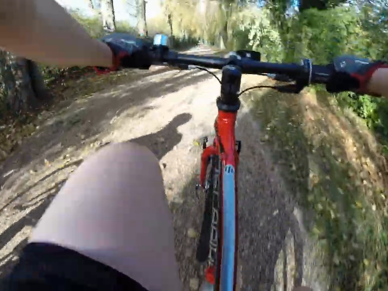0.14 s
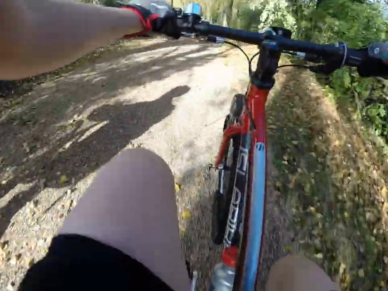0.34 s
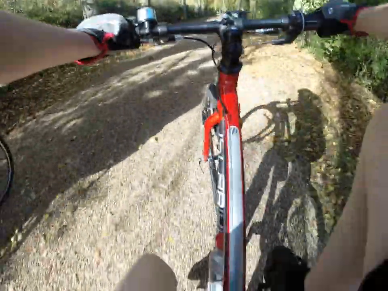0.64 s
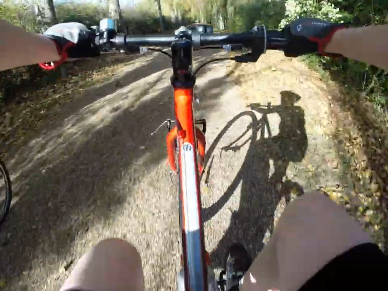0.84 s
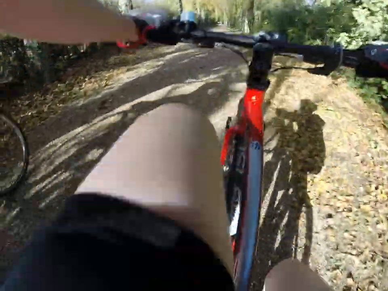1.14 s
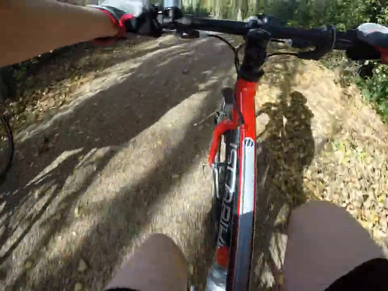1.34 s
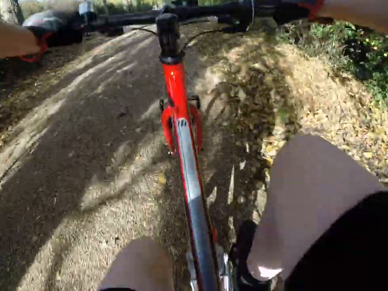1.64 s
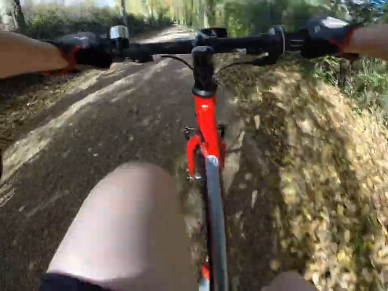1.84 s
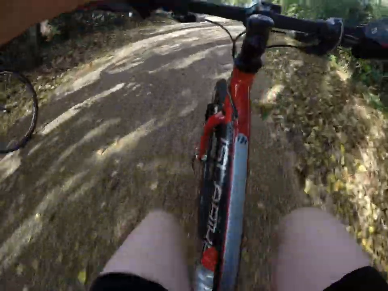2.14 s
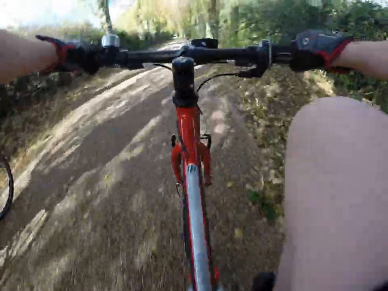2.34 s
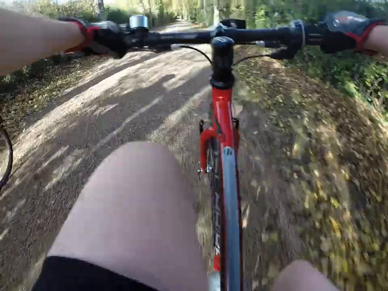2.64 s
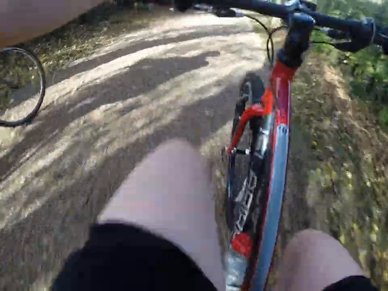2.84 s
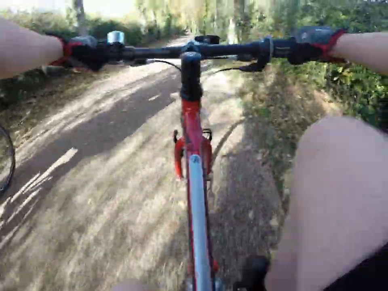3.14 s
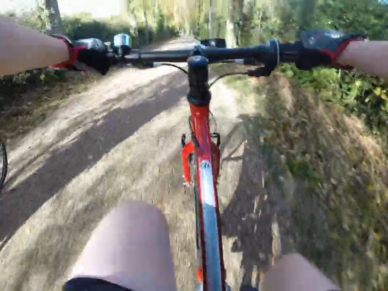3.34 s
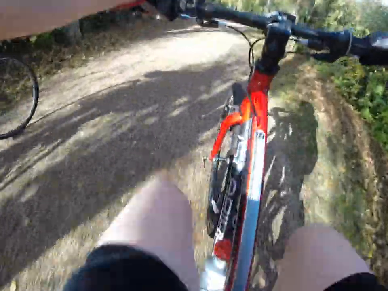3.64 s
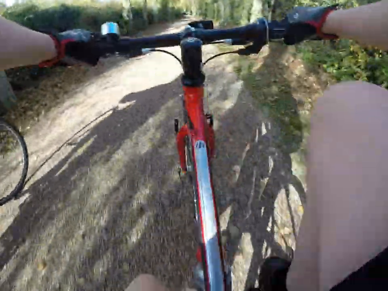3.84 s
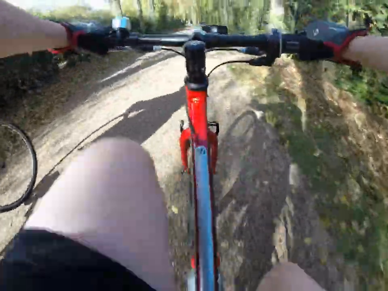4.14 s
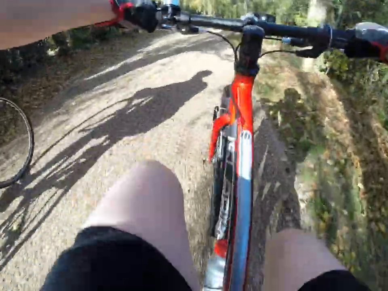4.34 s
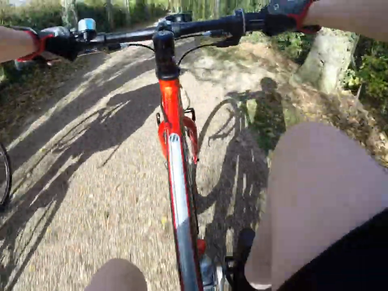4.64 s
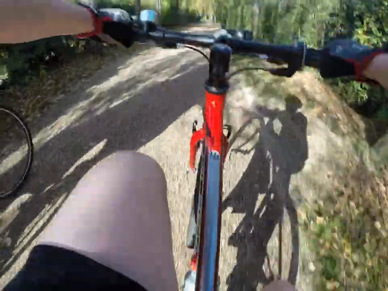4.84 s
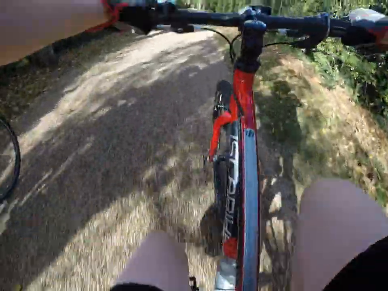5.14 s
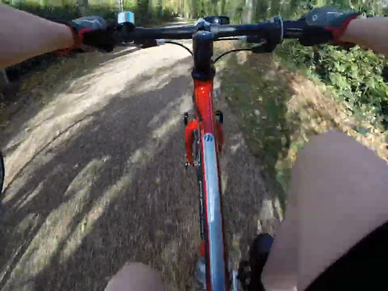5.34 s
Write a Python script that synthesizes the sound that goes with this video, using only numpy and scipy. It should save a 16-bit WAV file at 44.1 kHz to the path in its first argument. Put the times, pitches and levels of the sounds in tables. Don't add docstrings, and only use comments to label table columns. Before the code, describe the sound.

From 0 s, bicycle tyres grind steadily over gravel: a dense, grainy crunch strongest in the mid and upper-mid range, coloured boxy by a closed camera housing on the rider's chest. A thin dry-leaf hiss lies above it. Irregular stone pops, several each second, crack and ring briefly around 2.5 to 4.7 kHz, amid smaller pebble clicks, short scraping skids and leaf snaps. A plastic buckle ticks lightly near 2 kHz. Below, slow chest heaves make a very low, wavering rumble. Bumps shove the housing at about 1.2 s and 2.0 s with soft thumps and strap rub; another comes at 2.5 s with a cluster of leaf snaps. At 3.65 s the hardest bump thuds, scuffs the straps, knocks the mount and rattles the buckle. Crunch, pops and ticks continue, with further jolts near 4.8, 5.0 and 5.35 s, while the low heaves strengthen until 5.5 s. Mono, close, without echo.

```python
import sys
import numpy as np
from scipy import signal
from scipy.fft import rfft, irfft, next_fast_len
from scipy.io import wavfile
from scipy.ndimage import uniform_filter1d, map_coordinates

SR = 44100
rng = np.random.default_rng(int(sys.argv[2]) if len(sys.argv) > 2 else 0)


def to_wav(sig):
    pcm = np.clip(np.atleast_2d(sig), -1, 1) * 32767
    pcm = np.round(pcm).astype(np.int16)
    wavfile.write(sys.argv[1], SR, pcm.T)


def volts_from_decibels(level):
    exponent = np.asarray(level, float) / 20
    return 10 ** exponent


N = 242550

# (time [s], gravel level [dB], leaf litter level [dB])
GROUND = [(0.0, -43.5, -57), (0.52, -42, -56), (0.75, -42, -55), (0.98, -41.5, -58.5), (2.02, -43.5, -58),
          (2.14, -43.5, -58), (2.36, -41.5, -55.5), (2.56, -43.5, -57), (2.77, -43, -57.5),
          (2.99, -43, -58.5), (3.17, -44.5, -54.5), (3.49, -43, -59.5), (3.89, -44, -57.5),
          (4.35, -43.5, -58.5), (4.69, -41, -56.5), (5.08, -44.5, -62), (5.16, -42.5, -58),
          (5.5, -42, -60.5)]
# (time [s], coarse grit gain [dB], fine grit gain [dB])
WHEEL_LOADS = [(.64, 2.5, 1), (.89, 0.5, 1.5), (1.11, -3, -1.5), (1.42, 1, 4.5), (1.55, 0, 0),
               (1.61, -1, 2), (1.8, 0, 1.5), (1.91, 0, 1), (2.21, 2.5, 3.5), (2.37, 0, 0.5), (3.13, 2, -4),
               (3.25, 2, -2), (3.41, 1, 0), (3.68, 1.5, -0.5), (3.81, 1.5, -1), (4.07, 3.5, 2.5),
               (4.125, -1.5, -0.5), (4.21, -1, -1), (4.985, -0.5, 5), (5.015, -0.5, -5.5), (5.07, 5, 6.5),
               (5.45, -3.5, 2.5), (5.5, 3.5, 1)]
# (time [s], share [0-1])
CRISP_SHARE = [(0.0, .95), (0.15, 0.7), (0.5, 0.4), (0.9, 0.5), (1.2, 0.5), (1.4, 0.54), (2.05, 0.56),
               (2.3, 0.6), (2.6, 0.8), (2.85, 0.54), (3.4, .8), (3.55, 0.4), (3.7, 0.75), (4.3, 0.6),
               (4.6, 0.74), (5.0, .4), (5.2, .7), (5.5, 0.5)]
# (time [s], peak level [dB])
LEAF_SNAPS = [(0.0947, -59), (0.2468, -55), (0.5262, -44.5), (0.5901, -55), (2.3017, -43), (2.366, -43),
              (2.5331, -45), (4.0128, -48), (4.7361, -46), (2.4329, -45), (2.5002, -40), (3.571, -44),
              (3.6686, -46), (4.4463, -51), (4.8489, -44), (4.89, -43), (5.4595, -49), (1.39, -44.5),
              (2.21, -45), (3.81, -44), (4.62, -50)]
# (frequency [Hz], level [dB per Hz])
LEAF_SPECTRUM = [(5000, -36), (7000, -0.5), (8100, -7), (9040, -8.5), (9600, -6), (10150, -7.5),
                 (10600, -0.5), (11000, -6.5), (11600, -7.5), (12300, -4.5), (13200, -3.5), (14300, -10),
                 (15200, -10)]
# (frequency [Hz], gain [dB])
WALL = [(300, -17.5), (600, -11), (870, -14), (1250, -9), (2000, -5.5), (2900, -3.5), (4200, -10.5),
        (5200, -18.5), (6300, -15), (8200, -35.5), (15000, -43)]
# (frequency [Hz], width [Hz], gain [dB])
HOUSING_MODES = [(1499, 93, 7.5), (1673, 28, -7), (2080, 50, -6), (2850, 170, -0.5), (3145, 45, -8),
                 (3440, 61, 2.5), (3710, 320, -0.5), (4624, 320, 10), (6970, 64, -11), (7040, 150, -20),
                 (7380, 95, 9.5)]
# (time [s], peak level [dB], ring [Hz], broad crack relative to ring [dB])
STONES = [(0.2377, -21, 4550, -41), (0.384, -18, 3360, -8), (0.4596, -15.5, 4570, -17),
          (0.5923, -19, 2680, -12), (0.869, -20, 2660, -6), (0.8885, -21.5, 2380, 1.5),
          (1.132, -26, 2850, 1), (1.4118, -16, 2850, -18), (1.494, -16, 2650, -11), (1.548, -26, 2600, 4),
          (1.6134, -19, 4700, -7), (1.6658, -24, 2580, 1), (1.9086, -15, 2510, -11),
          (1.9792, -25, 4520, -3), (2.1782, -19.5, 2500, -1), (2.284, -24, 2950, 0),
          (2.366, -26.5, 2690, 3.5), (2.593, -14.5, 3530, -4.5), (2.9532, -17, 3520, -9),
          (3.238, -23, 2560, -4), (3.411, -17, 2640, -5), (3.7722, -25.5, 2820, 1), (4.051, -19, 4340, -14),
          (4.1385, -16, 4520, -18), (4.6307, -23, 4700, -1), (4.7625, -15, 2260, -11),
          (5.004, -19, 2770, -11), (5.1265, -17, 2800, -10), (5.331, -20, 2640, -9),
          (5.421, -20, 4700, -10)]
# (time [s], peak level [dB], ring [Hz])
PEBBLES = [(0.877, -28, 2400), (0.882, -23, 2290), (0.9874, -29, 1500), (1.9314, -28, 3450),
           (1.9994, -31, 2860), (2.0762, -28, 2500), (2.1208, -25, 2920), (2.5167, -27.5, 2860),
           (2.5604, -30, 2480), (2.6824, -31, 2300), (2.7421, -37, 3480), (2.7875, -27.5, 2260),
           (3.4056, -23, 2400), (3.7208, -27, 2080), (3.7967, -22.5, 3460), (3.9259, -30, 2570),
           (4.3514, -35, 2960), (4.8003, -26, 2190), (4.9474, -34, 2160)]
# (time [s], level [dB])
GRIT_CRACKS = [(0.3294, -48), (0.6073, -32), (0.8184, -31), (0.9334, -35), (1.433, -39), (1.5043, -35),
               (1.5535, -33.5), (1.8049, -29), (1.8607, -45), (1.9083, -35), (1.9507, -33), (2.24, -28.5),
               (2.3022, -38), (2.405, -35), (2.6826, -42), (2.7435, -41), (2.858, -35), (2.9085, -30.5),
               (3.065, -29.5), (3.245, -34), (3.4943, -33.5), (3.6298, -38), (3.958, -33), (3.997, -35),
               (4.1085, -35), (4.148, -33), (4.323, -34), (4.3616, -38), (4.6463, -30), (4.8606, -35),
               (4.8938, -35), (4.9578, -36), (5.0172, -31), (5.0782, -31), (5.135, -35), (5.3024, -34),
               (5.3712, -32), (5.4617, -29)]
# (time [s], peak level [dB])
PINGS = [(0.2186, -19), (0.485, -41), (0.844, -30), (1.3703, -36), (1.732, -19), (2.789, -26),
         (3.3116, -23), (3.436, -17), (3.7768, -18.5), (3.7976, -21), (3.8797, -30), (4.0972, -18.5),
         (4.176, -18.5), (4.3525, -25), (4.831, -20.5), (5.2395, -20), (5.3462, -15), (5.4496, -20)]
# (time [s], level [dB], pitch [Hz])
SCRAPES = [(.32, -43, 3800), (.352, -45, 3270), (.545, -43, 2580), (.4, -48, 6370), (.522, -39.5, 3770),
           (.56, -51, 6500), (.781, -46, 3940), (.856, -44, 4300), (.893, -52, 1420), (1.43, -42, 2860),
           (1.54, -51, 4970), (2.596, -47, 3280), (2.853, -42, 3600), (3.69, -48, 1230), (4.37, -42, 2820),
           (4.41, -44, 4510), (4.555, -45, 4750), (5.34, -44, 1900)]
# (time [s], peak level [dB], ring [Hz])
BUCKLE_TICKS = [(0.0094, -36.5, 2080), (0.11, -38, 2090), (0.2186, -37, 2190), (0.394, -29, 2080),
                (0.429, -34, 2040), (0.452, -36, 2000), (0.674, -27, 2090), (0.793, -33, 2170),
                (0.9176, -32.5, 2150), (1.187, -33.5, 2100), (1.2605, -37, 2080), (1.2698, -32.5, 2090),
                (1.2815, -35, 2050), (1.2838, -35, 1970), (1.2885, -37, 1980), (1.297, -38, 1950),
                (1.441, -39, 2300), (1.459, -34, 2080), (1.6785, -31.5, 2210), (1.78, -32, 2080),
                (2.225, -36, 2440), (2.8118, -31.5, 2050), (3.252, -30, 2040), (3.455, -34.5, 2100),
                (3.57, -35.5, 2020), (3.644, -24.5, 2080), (3.78, -34.5, 2410), (3.8708, -31.5, 2130),
                (4.025, -33, 2040), (4.21, -33.5, 2130), (4.458, -34, 2180), (4.749, -32, 2180),
                (4.8386, -38, 2220), (4.968, -26.5, 2110), (5.2486, -33.5, 2100), (5.3302, -30.5, 2030),
                (5.366, -36, 2400)]
# (time [s], peak level [dB], ring [Hz], gap [s])
BUCKLE_RATTLES = [
    (3.487, -31.5, 2060, 0.0083),
    (3.667, -33, 2160, 0.0071),
]
# (time [s], peak
# level [dB], quickness [Hz], direction
SHOVES = [(0.388, -32.5, 55, 1), (0.606, -39, 65, 1), (1.205, -36, 110, 1), (1.213, -22.5, 93, 1),
          (1.238, -26.5, 92, -1), (1.5761, -32, 155, -1), (1.726, -29.5, 148, -1), (1.9746, -29.5, 78, -1),
          (1.9886, -25.5, 92, -1), (2, -21, 78, -1), (2.015, -33, 55, 1), (2.055, -31.0, 65, -1),
          (2.4081, -35, 65, -1), (2.5033, -23, 92, 1), (2.522, -29, 65, -1), (2.7277, -31.5, 77, 1),
          (2.833, -25.5, 65, 1), (2.862, -31, 55, -1), (3.271, -36, 65, 1), (3.3161, -30, 55, -1),
          (3.4727, -35, 78.5, 1), (3.6476, -29, 92, 1), (3.6574, -22, 91.5, 1), (3.661, -40, 55, 1),
          (3.6695, -18.5, 90.5, 1), (3.6805, -15.5, 109, -1), (3.699, -31, 55, -1), (3.7616, -30, 78, 1),
          (3.785, -30, 92, 1), (3.896, -32.5, 92, -1), (4.0226, -26, 55, -1), (4.034, -34, 55, 1),
          (4.1154, -30, 64.4, -1), (4.521, -28.5, 55, -1), (4.6414, -35, 55, 1), (4.771, -29.5, 129, 1),
          (4.789, -30, 93, -1), (4.8073, -24, 55, -1), (4.844, -41, 65, -1), (4.887, -35, 65, -1),
          (4.906, -31, 92, 1), (4.933, -27, 65, -1), (5.0079, -24.5, 65, -1), (5.058, -36, 55, -1),
          (5.0703, -25.5, 55, 1), (5.252, -34, 55, 1), (5.329, -32, 78, -1), (5.3765, -29.5, 55, 1),
          (1.2032, -34, 320, 1), (1.2259, -34.2, 170, 1), (1.2349, -35, 170, -1),
              (1.573, -35.4, 400, 1), (1.6975, -37, 170, 1), (1.9876, -33, 170, 1), (2.0116, -37, 170, 1),
              (2.4985, -41, 343, -1), (2.8246, -37, 260, -1), (2.8423, -35.5, 171, -1),
              (3.251, -30.5, 170, -1), (3.2685, -32.5, 170, -1), (3.6495, -32, 170, 1),
              (3.655, -37, 210, 1), (3.6628, -27, 170, 1), (3.669, -26, 209, -1), (3.6778, -29, 210, -1),
              (3.6842, -35, 170, -1), (3.7546, -35.5, 210, -1), (3.8066, -40, 170, 1),
              (4.42, -36.5, 166, 1), (4.7774, -34, 210, 1), (4.786, -33, 209, 1), (4.7946, -32, 170, 1),
              (5.0059, -34, 260, 1), (5.372, -39, 170, -1)]
# (time [s], level [dB])
STRAP_SCUFFS = [(1.2, -37), (1.235, -43), (1.567, -42), (1.717, -42), (1.987, -35), (2.366, -49),
                (2.491, -34), (2.82, -41), (3.254, -44), (3.462, -46), (3.646, -24.5), (3.662, -26.5),
                (3.677, -30), (3.749, -46), (4.272, -48), (4.413, -58), (4.769, -36), (4.895, -42),
                (5.0, -40), (5.054, -37), (5.365, -43)]
# (time [s], peak level [dB], ring [Hz])
MOUNT_KNOCKS = [(0.881, -34, 1420), (2.496, -35, 900), (3.133, -39, 1200), (3.405, -36, 1130),
                (3.487, -36, 1100), (3.678, -22, 1050), (4.688, -35, 1090), (4.849, -28, 1510),
                (5.494, -52, 703)]
# (time [s], level [dB])
HEAVES = [(.04, -35.5), (.29, -37), (.5, -43), (.72, -39), (1.03, -36), (1.22, -26.5), (1.3, -51),
          (1.5, -37.5), (1.62, -38), (1.77, -35.5), (1.89, -41), (2.04, -31), (2.31, -34.5), (2.51, -27.5),
          (2.8, -38), (2.9, -29), (3.11, -41), (3.23, -38), (3.31, -35), (3.45, -38), (3.67, -40),
          (3.82, -40.5), (4.03, -27.5), (4.13, -41), (4.3, -33.5), (4.451, -32), (4.68, -27.5), (4.82, -35),
          (5.069, -24.5), (5.26, -27.5), (5.49, -22.5)]
# (time [s], jolt level [dB], strap rub relative to jolt [dB])
JOLTS = [(0.005, -46, 2), (.27, -52, 3), (.38, -73, -44), (.47, -67, -9), (.6, -57, -27), (.83, -42, -19),
         (.95, -61, -10), (1.04, -38, -13), (1.22, -33, -12), (1.58, -33.5, -5.5), (1.73, -43.5, -2.5),
         (1.998, -29, -15.5), (2.4, -33, -15.5), (2.5, -27.5, -11), (2.73, -43, -9), (2.832, -35.5, -4),
         (3.19, -44, -1), (3.261, -34, -12), (3.46, -32.5, -27), (3.57, -50, -4), (3.673, -29, -10.5),
         (3.76, -42, -7), (3.87, -51, -10), (3.97, -46, 2.5), (4.29, -40.5, -3), (4.78, -39, -5),
         (4.9, -42, -5), (5.01, -32.5, -5.5), (5.37, -31.5, -23), (5.5, -35, -10)]
# (time [s], level [dB])
EFFORT = [(0.0, -50), (1.16, -49), (1.26, -49.5), (2.02, -52.5), (2.45, -52.5), (3.31, -51),
          (3.81, -45.5), (4.26, -52.5), (4.58, -51), (4.92, -47), (5.18, -49), (5.5, -54.5)]
# (frequency [Hz], level [dB per Hz])
SWAY_SPECTRUM = [(4, -15.5), (8, -0.5), (22, 3.5), (31, 2), (41, -9), (55, -24.5), (90, -35), (150, -62)]
# (frequency [Hz], level [dB per Hz])
JOLT_SPECTRUM = [(30, -18.5), (55, -3), (90, 2.5), (115, -3), (135, -4), (180, -8.5), (260, -52),
                 (400, -62.5)]
# (frequency [Hz], level [dB per Hz])
RUB_SPECTRUM = [(120, -25.5), (200, 3.5), (240, 0.5), (290, -3), (470, -4.5), (800, -16.5), (1200, -12),
                (2000, -33)]


def tyres():
    gravel_db, litter_db = curves(GROUND)
    coarse_db = swells([(s, db) for s, db, _ in WHEEL_LOADS], width_s=0.035)
    fine_db = swells([(s, db) for s, _, db in WHEEL_LOADS], width_s=0.035)
    surge_db = wobble(45)

    crackle = grains(low_hz=1900, high_hz=7540, cycles=1.86, spread_db=3.5, clump=0.5, count=14000)
    grind = patchy(depth_db=2) + volts_from_decibels(-5) * crackle
    grind += volts_from_decibels(-2) * grit(per_s=1500, spread_db=3.3, clump=0.7)
    crunch = unit(steady(coloured(grind, housing), span_s=0.42, share=0.38))

    upper = np.clip((np.fft.rfftfreq(N, 1 / SR) - 4900) / 600, 0, 1)
    sand = irfft(rfft(crunch) * upper, N)
    gravel = volts_from_decibels(gravel_db + coarse_db + 0.16) * (crunch - sand)
    sand_db = -54 + 0.38 * (gravel_db - gravel_db.mean()) + (litter_db - litter_db.mean()) + fine_db
    ground = volts_from_decibels(0.55 * surge_db) * (gravel + volts_from_decibels(sand_db) * unit(sand))
    leaf_db = litter_db + 0.71 * fine_db + 1.0 + 0.89 * surge_db + 0.22 * wobble(21.3)
    return ground + volts_from_decibels(leaf_db) * leaf_hiss() + leaf_snaps()


def leaf_hiss():
    rustle = patchy(depth_db=2.0, size=6) + volts_from_decibels(-7) * grit(per_s=1200, spread_db=4.5, clump=0.61)
    crisp = unit(steady(shaped(rustle, LEAF_SPECTRUM), span_s=0.51, share=0.7))
    dull = shaped(crisp, [(11000, 2.5), (15000, -10)])
    share = np.clip(curves(CRISP_SHARE)[0] + 0.058 * wobble(12), 0, 1)
    return share * crisp + (1 - share) * dull


def leaf_snaps():
    snaps, t = np.zeros(N), np.arange(300) / SR
    for s, db in LEAF_SNAPS:
        add(snaps, s, volts_from_decibels(db + 6.5) * rng.standard_normal(len(t)) * volts_from_decibels(-60 * t / 0.012))
    return shaped(snaps, LEAF_SPECTRUM)


def stones():
    events = STONES + [(s, db + 3.5, hz, -2.5) for s, db, hz in PEBBLES]
    events = events + [(s, db + 3.5, 2620, 3) for s, db in GRIT_CRACKS]
    events = events + [(s, db, 4520, -12) for s, db in PINGS]
    rings, cracks, t = np.zeros(N), np.zeros(N), np.arange(500) / SR
    crumble = volts_from_decibels(-60 * t / 0.011) * (1 - np.exp(-t / 0.0006))
    first_break = 7.5 * (np.arange(len(t)) == 30)
    for s, db, hz, crack_db in events:
        add(rings, s - 0.0004, volts_from_decibels(db - 14) * ring(hz, rise_s=0.0004, t60=0.018, length_s=0.03))
        burst = unit((rng.standard_normal(len(t)) + first_break) * crumble)
        add(cracks, s - 0.0003, volts_from_decibels(db + crack_db + 4.5) * burst)
    tilt = [(800, -26), (1500, -15), (2400, -11), (3600, -6), (4600, -9.5), (6000, -11)]
    return rings + coloured(cracks, lambda hz: housing(hz) + along(tilt, hz))


def scrapes():
    out, t = np.zeros(N), np.arange(-2000, 2000) / SR
    half_s, fall_per_s = 0.013, 2.2
    noises = rng.standard_normal((len(SCRAPES), 2, len(t)))
    for (s, db, hz), noise in zip(SCRAPES, noises):
        a, b = uniform_filter1d(uniform_filter1d(noise, size=28), size=16)
        phase = 2 * np.pi * hz * t * (1 - fall_per_s * t / 2)
        band = unit(a * np.sin(phase) + b * np.cos(phase))
        add(out, s + t[0], volts_from_decibels(db) * np.exp(-0.5 * (t / half_s) ** 2) * band)
    return out


def buckle():
    out, t = np.zeros(N), np.arange(600) / SR
    bounces = [(s + k * gap_s, db - k * 4.5, hz) for s, db, hz, gap_s in BUCKLE_RATTLES for k in range(4)]
    after = t - 0.0022
    for s, db, hz in BUCKLE_TICKS + bounces:
        width_s = 0.00103 * np.exp(0.07 * rng.standard_normal())
        beat_hz = 200 + 250 * rng.random()
        burst = np.exp(-0.5 * (after / width_s) ** 2)
        tail = 0.25 * (after > 0) * volts_from_decibels(-60 * after / 0.03) * np.cos(2 * np.pi * beat_hz * after)
        add(out, s - 0.0011, volts_from_decibels(db + 2.2) * (burst + tail) * np.sin(2 * np.pi * hz * t))
    return out


def shoves():
    out, t = np.zeros(N), np.arange(SR // 10) / SR
    for s, db, hz, direction in SHOVES:
        u = (np.pi * hz * (t - 0.05)) ** 2
        add(out, s - 0.05, np.sign(direction) * volts_from_decibels(db) * (1 - 2 * u) * np.exp(-u))
    return out


def strap_scuffs():
    out, t = np.zeros(N), np.arange(SR // 10) / SR
    decay = volts_from_decibels(-60 * t / 0.058) * (1 - np.exp(-t / 0.0057))
    for s, db in STRAP_SCUFFS:
        add(out, s, volts_from_decibels(db + 14.0) * rng.standard_normal(len(t)) * decay)
    return shaped(out, RUB_SPECTRUM)


def mount_knocks():
    out = np.zeros(N)
    for s, db, hz in MOUNT_KNOCKS:
        add(out, s, volts_from_decibels(db) * ring(hz, rise_s=0.00015, t60=0.0056, length_s=0.04))
    return out


def shake():
    effort_db, = curves(EFFORT)
    heaving = volts_from_decibels(-38.5) + swells([(s, volts_from_decibels(db)) for s, db in HEAVES], width_s=0.047)
    jolting = volts_from_decibels(effort_db + 3) + swells([(s, volts_from_decibels(db - 7.5)) for s, db, _ in JOLTS], width_s=0.019)
    rubbing = volts_from_decibels(-55 + effort_db - effort_db.mean())
    rubbing += swells([(s, volts_from_decibels(db + rub_db - 6)) for s, db, rub_db in JOLTS], width_s=0.019)
    lumps_db, kicks = wobble(42), grit(per_s=45, spread_db=1.0, clump=0.27)

    def kicked(spectrum, kick_db):
        return shaped(rng.standard_normal(N) + volts_from_decibels(kick_db) * kicks, spectrum)

    sway = steady(kicked(SWAY_SPECTRUM, kick_db=-12.5), span_s=0.05, share=0.7)
    sway = unit(shaped(sway, [(38, -5.0), (60, 0.5), (120, -39.5)]))
    jolt = steady(kicked(JOLT_SPECTRUM, kick_db=-2.5), span_s=0.043, share=0.48)
    jolt = unit(volts_from_decibels(1.4 * lumps_db) * jolt)
    rub = steady(kicked(RUB_SPECTRUM, kick_db=-8.5), span_s=0.14, share=0.99)
    rub = unit(volts_from_decibels(1.6 * lumps_db + 1.36 * wobble(70)) * rub)
    return heaving * sway + volts_from_decibels(-3) * jolting * jolt + volts_from_decibels(-4.0) * rubbing * rub


def housing(hz):
    modes = sum(db * np.exp(-0.5 * ((hz - c) / w) ** 2) for c, w, db in HOUSING_MODES)
    return along(WALL, hz) + modes


def unit(x):
    return x / np.sqrt(np.mean(x ** 2) + 1e-20)


def along(points, hz):
    f, v = np.transpose(points)
    return np.interp(np.log(hz + 1), np.log(f + 1), v)


def curves(rows):
    s, *cols = np.transpose(rows)
    return [np.interp(np.arange(N) / SR, s, c) for c in cols]


def swells(rows, width_s):
    t = np.arange(0, N + 64, 64) / SR
    total = sum(h * np.exp(-0.5 * ((t - s) / width_s) ** 2) for s, h in rows)
    return np.interp(np.arange(N) / SR, t, total)


def wobble(rate):
    knots = rng.standard_normal(int(N * rate / SR) + 4)
    return map_coordinates(knots, [np.arange(N) * rate / SR])


def coloured(x, db_at):
    m = 2 * next_fast_len(N // 2 + 8192)
    cepstrum = irfft(np.log(volts_from_decibels(db_at(np.fft.rfftfreq(m, 1 / SR))) + 1e-6), m)
    cepstrum[1:m // 2] *= 2
    cepstrum[m // 2 + 1:] = 0
    return irfft(rfft(x, m) * np.exp(rfft(cepstrum)), m)[:N]


def shaped(x, points):
    return coloured(x, lambda hz: along(points, hz))


def patchy(depth_db, size=4):
    z = signal.stft(rng.standard_normal(N), nperseg=256)[2]
    field = uniform_filter1d(rng.standard_normal(z.shape), size=size, axis=0)
    field = uniform_filter1d(field, size=size, axis=1)
    return unit(signal.istft(z * volts_from_decibels(depth_db * unit(field)), nperseg=256)[1][:N])


def grit(per_s, spread_db, clump):
    hit = rng.random(N) < per_s / SR * np.exp(clump * wobble(70))
    size_db = spread_db * np.minimum(rng.exponential(size=N), 3)
    return unit(hit * rng.standard_normal(N) * volts_from_decibels(size_db))


def grains(low_hz, high_hz, cycles, spread_db, clump, count):
    density = np.cumsum(np.exp(clump * wobble(70)))
    u = rng.random((count, 4))
    start = np.searchsorted(density / density[-1], u[:, 0])
    hz = (low_hz * (high_hz / low_hz) ** u[:, 1])[:, None]
    k = np.arange(160)
    turns = hz * k / SR
    shape = turns / cycles * np.exp(1 - turns / cycles) * np.sin(2 * np.pi * (turns + u[:, 2:3]))
    shape *= volts_from_decibels(-spread_db * np.log(u[:, 3:] + 1 / 30)) * np.sqrt(hz)
    return unit(np.bincount((start[:, None] + k).ravel(), shape.ravel(), N + k.size)[:N])


def steady(x, span_s, share):
    power = np.abs(uniform_filter1d(x ** 2, size=round(span_s * SR))) + 1e-3 * np.mean(x ** 2)
    return x / power ** (share / 2)


def ring(hz, rise_s, t60, length_s):
    t = np.arange(round(length_s * SR)) / SR
    shape = (1 - np.exp(-(t / rise_s) ** 2)) * volts_from_decibels(-60 * t / t60)
    return shape / shape.max() * np.sin(2 * np.pi * hz * t)


def add(track, s, sound):
    part = track[max(round(s * SR), 0):][:len(sound)]
    part += sound[:len(part)]


def scene():
    ground = tyres() + stones() + scrapes()
    mount = buckle() + shoves() + strap_scuffs() + mount_knocks() + shake()
    return (ground + mount)[None]


def roll_off(x):
    return signal.sosfilt(signal.butter(12, 15330, fs=SR, output="sos"), x)


def record(dry):
    top_hz = 15290
    kept = irfft(rfft(dry) * (np.fft.rfftfreq(N, 1 / SR) < top_hz), N)
    return roll_off(kept)


dry = scene()
out = record(dry)
to_wav(out)
```